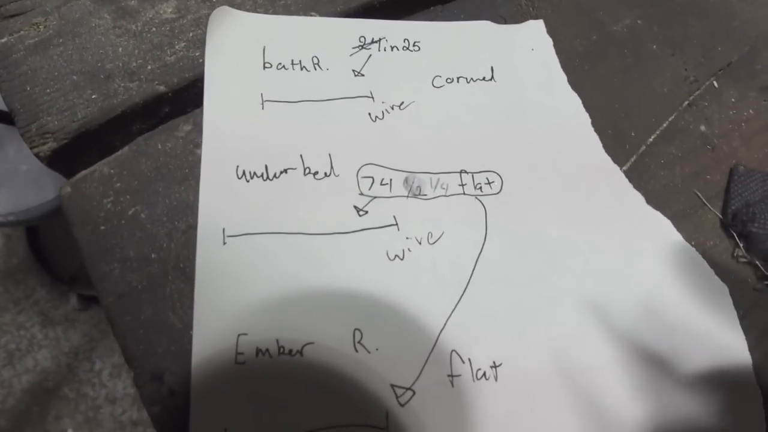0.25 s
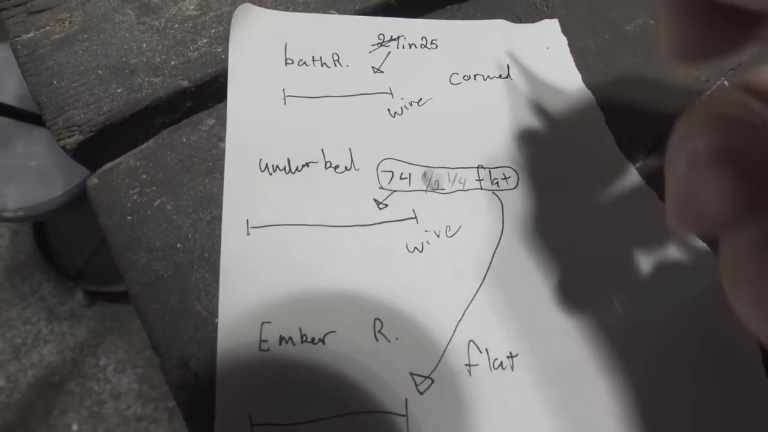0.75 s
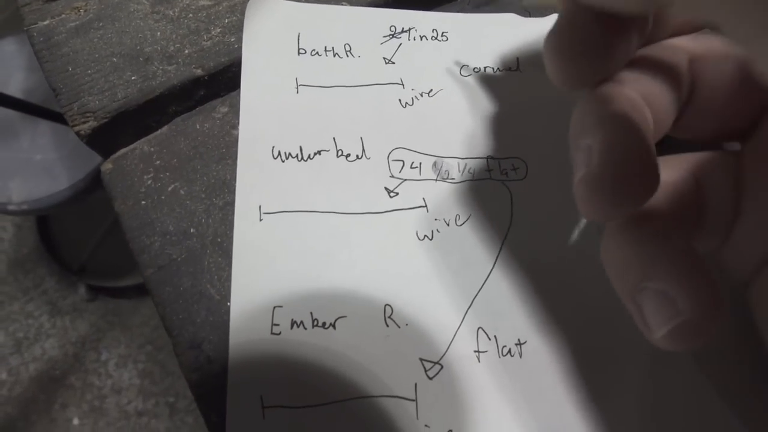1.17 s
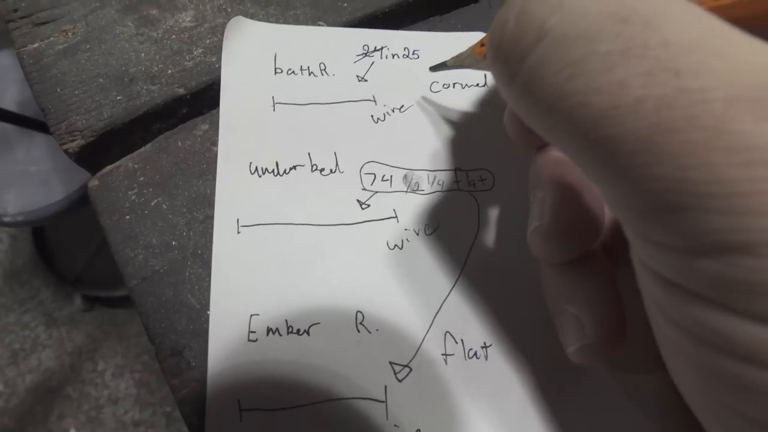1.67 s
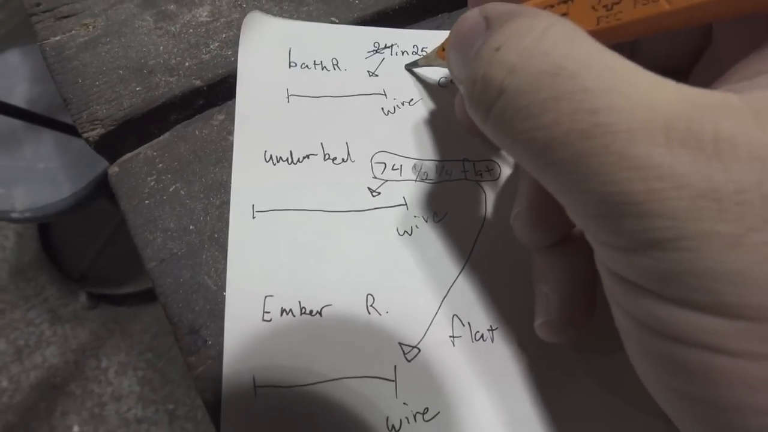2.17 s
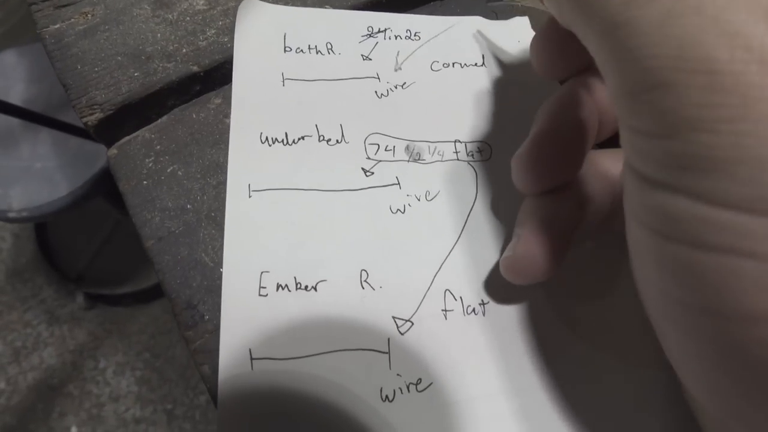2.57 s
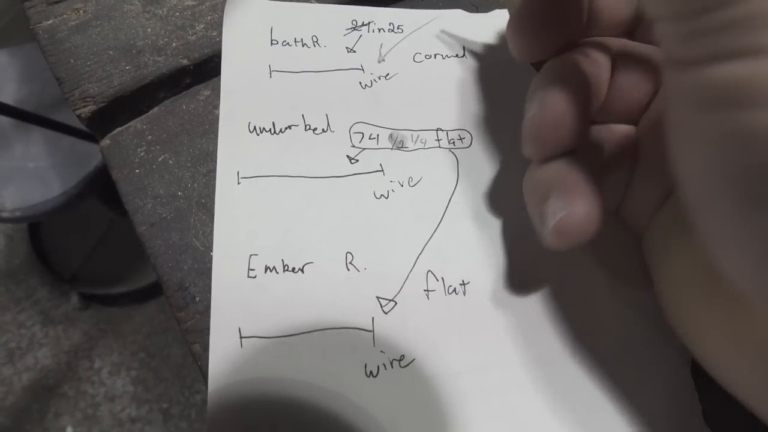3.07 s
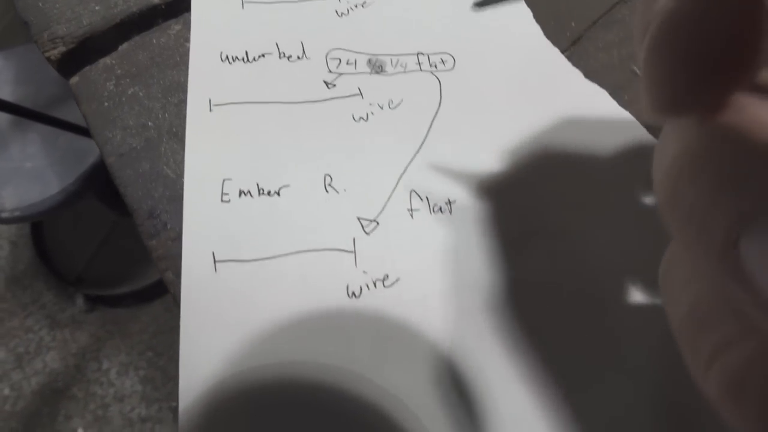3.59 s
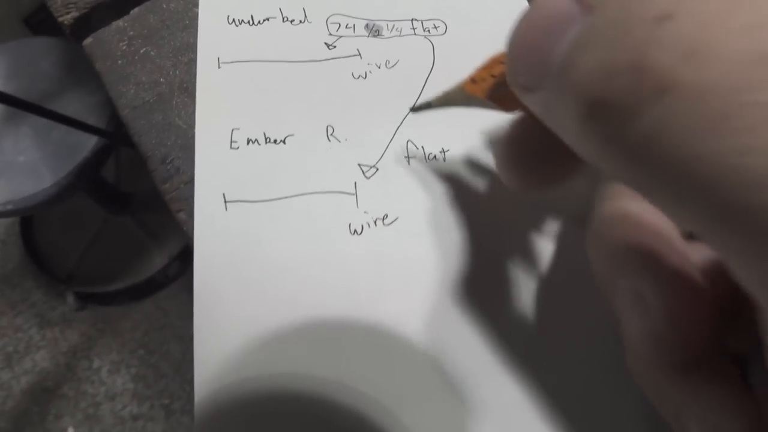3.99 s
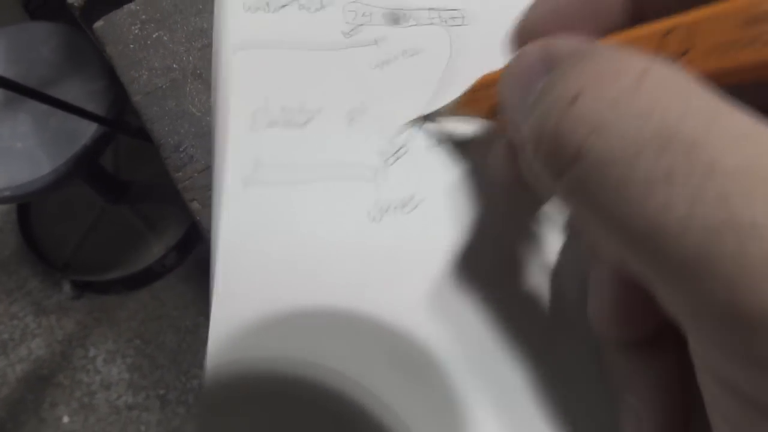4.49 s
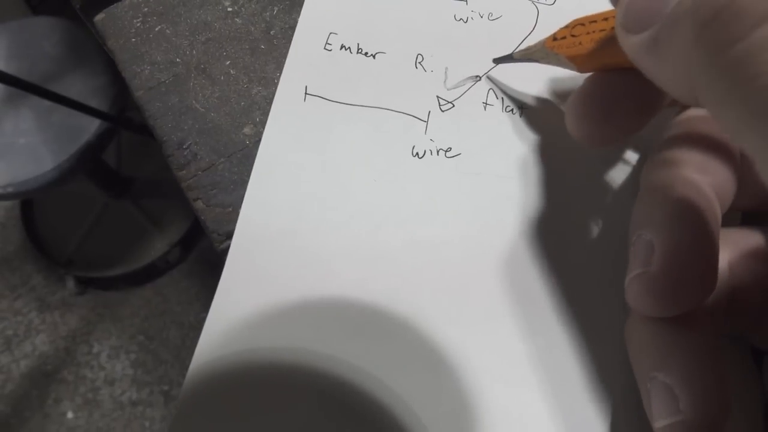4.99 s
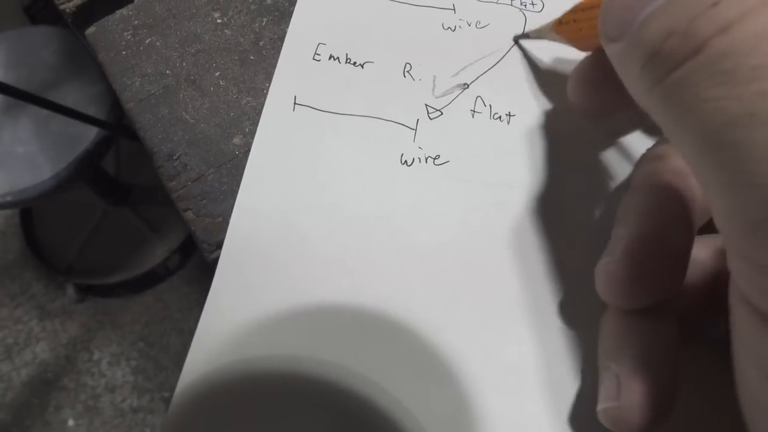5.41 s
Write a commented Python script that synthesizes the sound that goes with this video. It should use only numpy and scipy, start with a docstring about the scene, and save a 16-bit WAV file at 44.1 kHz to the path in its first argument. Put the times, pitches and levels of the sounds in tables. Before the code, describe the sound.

A lamp ballast buzzes continuously in a workshop, over soft hiss and low rumble, its bright overtones slowly swelling and fading. Faint grainy rattles come first; a pencil then taps and scratches paper on a hard slab around 2.3 seconds, again more sharply near 4.5, and a last time at the end. Close handheld stereo microphones, short dry room echo.

```python
"""A workshop: a lamp ballast buzzes at twice the mains frequency over patchy hiss and a soft rumble.
The buzz is a stack of overtones; hand-held microphones drift through its standing waves, so they swell and fade.
A pencil taps and scratches ticks on a sheet of paper on a hard slab: single blows and rough noise ring
resonances of tip, sheet, shaft and slab. Something small rattles now and then in bursts of grainy noise."""
import sys
import numpy as np
from scipy import signal
from scipy.fft import rfft, irfft, next_fast_len
from scipy.io import wavfile
from scipy.ndimage import uniform_filter1d, map_coordinates

SR = 44100
rng = np.random.default_rng(int(sys.argv[2]) if len(sys.argv) > 2 else 0)


def wav_record(signal):
    """Record a signal, one row per channel, as 16-bit PCM in the file named by sys.argv[1]."""
    frames = np.transpose(np.atleast_2d(signal))
    bounded = np.clip(frames, -1, 1)
    # unit amplitude maps onto the largest positive 16-bit level
    quanta = np.round(bounded * 32767).astype(np.int16)
    wavfile.write(sys.argv[1], SR, quanta)


N = 249165

# Resonances; body() applies each set twice. Columns: f/Hz, width/Hz, level per pass/dB
# graphite tip on paper fibres
TIP_MODES = [(6500, 950, 0), (9600, 1200, -1.5), (13200, 3000, -5)]
# paper on its hard support
SLAB_MODES = [(250, 120, 1), (680, 300, -1.5), (1150, 450, 0)]


def amp(db):
    """Decibels to gain."""
    return 10 ** (np.asarray(db) / 20)


def unit(x):
    """Scale to rms 1."""
    return x / np.sqrt(np.mean(x ** 2) + 1e-20)


def along(points, hz):
    """Read (Hz, value) points on a log frequency axis."""
    f, v = np.transpose(points)
    return np.interp(np.log(hz + 1), np.log(f + 1), v)


def curves(rows):
    """One value per sample for each column after the time."""
    seconds, *columns = np.transpose(rows)
    return [np.interp(np.arange(N) / SR, seconds, c) for c in columns]


def wobble(rate):
    """A random curve of straight segments, rate knots a second."""
    knots = rng.standard_normal(int(N * rate / SR) + 4)
    return map_coordinates(knots, [np.arange(N) * rate / SR], order=1)


def filtered(x, response):
    """x times a complex response of frequency."""
    m = next_fast_len(N + SR // 2)
    spectrum = rfft(x, m) * response(np.fft.rfftfreq(m, 1 / SR))
    return irfft(spectrum, m)[..., :N]


def body(x, modes):
    """x through a set of resonances, twice over: the valleys between them are deep."""
    def response(f):
        total = 0
        for k, (centre, width, db) in enumerate(modes):
            resonance = 1j * f * width / (centre ** 2 - f ** 2 + 1j * f * width)
            total = total + (-1) ** k * amp(db) * resonance
        return total ** 2
    return filtered(x, response)


def grit(spike_db):
    """Noise whose samples differ widely in size when spike_db is high, like fibres catching."""
    return unit(rng.standard_normal(N) * amp(spike_db * wobble(900)))


def ballast():
    """Each overtone meets the standing waves in its own way, with a small phase difference left to right."""
    # base pitch of the buzz. Columns: t/s, f/Hz
    pitch = [(0, 120.003), (2, 119.992), (3.7, 119.974), (5.65, 119.978)]
    # strong overtones. Columns: multiple, level/dB, then dB per unit of sway, of lean, of tilt
    strong_rows = [(4, -60.0, -0.2, 0.4, 0.4), (5, -56.8, -0.5, 0.0, -0.0), (8, -56.1, 0.7, -0.4, 0.4),
                   (15, -54.1, -0.8, -0.1, -1.3), (16, -57.9, 5.4, -0.5, 1.3), (17, -48.6, 4.4, 0.2, -0.1),
                   (19, -55.8, -1.3, 2.4, 3.0), (20, -45.7, -1.1, -1.6, -1.0), (22, -51.0, 3.2, 1.4, -0.4),
                   (23, -55.1, -0.9, 0.0, -0.7), (24, -53.4, -3.2, 2.4, -1.7), (25, -57.1, 4.8, -2.1, -1.6),
                   (29, -55.5, -1.0, -1.4, 5.0), (30, -52.2, -1.1, 3.1, 0.6), (33, -54.2, -0.1, 0.1, -0.3),
                   (34, -60.2, -3.5, -0.2, -1.8), (36, -57.5, -0.7, 4.6, 1.4), (42, -60.8, 0.2, 1.6, 3.9),
                   (43, -57.7, -2.0, -4.2, 0.5), (44, -61.0, -0.5, -3.1, 3.3), (47, -65.5, 0.4, 2.3, -1.1),
                   (53, -68.1, -1.4, -5.1, 2.5), (58, -64.7, 0.8, 5.8, -1.0), (59, -67.3, -3.5, -4.4, -0.1),
                   (74, -69.2, 6.2, -1.1, 0.9), (86, -66.5, -0.0, 1.6, 0.3), (87, -68.1, -1.6, -2.4, -0.1),
                   (89, -68.1, -0.9, -1.3, -0.4)]
    # drift of the microphones in the standing waves. Columns: t/s, sway, lean, tilt [arbitrary units]
    drift_path = [(0.1, 0.5, -1.8, 0.4), (1.3, 0.6, -1.0, -0.2), (1.45, 0.6, -0.3, 0.8),
                  (1.75, 1.0, 0.2, 1.1), (2.0, 0.8, 0.6, 1.2), (2.6, 0.7, 1.5, 0.4), (3.1, 0.4, 1.9, 0.3),
                  (3.3, 0.3, 1.2, -1.5), (3.6, 0.4, 0.0, -2.6), (4.0, -0.7, -0.2, -0.6),
                  (4.3, -1.7, 0.1, 0.2), (4.8, -2.0, 0.1, 0.5)]
    # ceiling of the weaker overtones, before drift and waver. Columns: f/Hz, level/dB
    weak_ceiling = [(480, -58), (780, -68.5), (1500, -60), (3600, -59), (4700, -66), (6400, -68),
                    (8200, -73.5), (9100, -71.5), (11000, -77), (14000, -84)]
    # middle level of the faint lines between the overtones. Columns: f/Hz, level/dB
    halfway = [(2400, -67.5), (4700, -70), (8200, -81.5), (11000, -80), (14000, -90)]
    weak_spread_db, weak_drift_db = 4, 1.76  # scatter below the ceiling; swing per unit of drift
    turn = 2 * np.pi * np.cumsum(curves(pitch)[0]) / SR
    t, step = np.arange(N), 64  # levels are worked out every 64 samples
    drift = np.array(curves(drift_path))[:, ::step]
    seconds = t[::step] / SR
    out, halves = np.zeros((2, N)), np.zeros(N, complex)
    strong = {row[0]: row[1:] for row in strong_rows}
    for k in range(4, 122):
        tone = np.exp(1j * k * turn)
        hz = k * pitch[0][1]
        start, start_half = rng.uniform(0, 2 * np.pi, size=2)
        apart, scatter, scatter_half, *swing = rng.normal(size=6)
        weak_db = along(weak_ceiling, hz) - weak_spread_db * abs(scatter)
        weak_slopes = weak_drift_db * np.array(swing)
        db, *slopes = strong.get(k, (weak_db, *weak_slopes))
        waver_db = 0.88 * np.interp(seconds, np.arange(13) / 2, rng.normal(size=13))
        level = amp(db + slopes @ drift + waver_db)
        wave = np.interp(t, t[::step], level) * np.sqrt(2) * tone  # levels are rms
        lead = .2 * apart  # radians
        left = (wave * np.exp(1j * (start + lead))).imag
        right = (wave * np.exp(1j * (start - lead))).imag
        out += [left, right]
        if 20 <= k < 110:  # the two half-cycles of the mains are not quite alike: faint lines halfway
            half_db = along(halfway, hz) + 6.6 * scatter_half
            halves += amp(half_db) * np.exp(1j * start_half) * tone
    return out + (halves * np.exp(.5j * turn)).imag  # half a multiple higher


def room():
    """Patchy hiss of the workshop, its low end swelling slowly as a rumble."""
    # colour of the hiss. Columns: f/Hz, relative level per Hz/dB
    air_colour = [(30, -37), (62, -17), (125, -1), (220, 0), (400, -7.5), (780, -12.5), (980, -11),
                  (1500, -13.5), (2300, -12), (3100, -17.5), (4700, -21.5), (6500, -24.5), (8300, -30.5),
                  (10500, -29), (14500, -41), (16000, -55)]
    # likeness of left and right. Columns: f/Hz, correlation
    likeness = [(60, 1), (500, 0.75), (12000, 0.49)]
    # swell of the low rumble. Columns: t/s, level change/dB
    rumble_swell = [(0, 2.5), (1, -3), (4.7, 0), (5.65, -1.5)]
    z = signal.stft(rng.standard_normal((2, N)), nperseg=512)[2]
    # random patches, smoothed over frequency and then time
    field = uniform_filter1d(rng.standard_normal(z.shape[1:]), 6, 0)
    field = uniform_filter1d(field, 14, 1)
    pair = signal.istft(z * amp(0.68 * unit(field)), nperseg=512)[1][:, :N]

    def mid_side(hz):
        angle = np.arccos(np.clip(along(likeness, hz), -1, 1)) / 2
        return amp(along(air_colour, hz)) * [np.cos(angle), np.sin(angle)]

    mid, side = filtered(pair, mid_side)
    air = amp(-45.5) * unit(np.array([mid + side, mid - side]))
    low = filtered(air, lambda hz: 1 / (1 + (hz / 350) ** 4))
    return air + (amp(curves(rumble_swell)[0]) - 1) * low


def rattles():
    """Short bursts of grainy contact that die away."""
    # bursts, level before the onset and fade. Columns: t/s, length/s, level/dB
    bursts = [(0.0, 0.056, -49), (.47, 0.087, -45), (0.714, .12, -46), (1.192, 0.11, -43),
              (3.169, 0.16, -39.5), (3.857, 0.12, -44.5), (5.507, .07, -38.5)]
    # resonances of the small loose thing. Columns: f/Hz, width/Hz, level per pass/dB
    loose_modes = [(1800, 500, -1), (2500, 1000, 0), (5500, 4000, -13)]
    t, shape = np.arange(N) / SR, np.zeros(N)
    for s, length, db in bursts:
        onset = np.clip((t - s) / .01, 0, 1)
        fade = np.clip((s + length - t) / length, 0, 1)
        shape += amp(db) * onset * fade
    return shape * amp(4.0 * wobble(90)) * unit(body(grit(spike_db=0.0), loose_modes))


def taps(events, modes, gain_db):
    """Single blows ringing a set of resonances."""
    blows = np.zeros(N)
    for s, db in events:
        blows[round(s * SR)] = amp(db + gain_db)
    return body(blows, modes)


def knocks():
    """The pencil lands: each blow rings the paper on its slab."""
    # landings. Columns: t/s, level before the blow gain/dB
    landings = [(0.082, -29), (2.255, -26.5), (2.411, -23), (2.444, -12.5), (4.512, -32), (5.373, -20.5),
                (5.428, -26), (5.577, -25)]
    return taps(landings, SLAB_MODES, gain_db=29.0)


def ticks():
    """The tip touches the paper: each blow rings its two lower resonances."""
    # touches. Columns: t/s, level before the blow gain/dB
    touches = [(2.2418, -29), (2.2534, -37), (2.3984, -13), (4.4144, -32), (4.4224, -38), (4.5665, -12),
               (5.3672, -22), (5.5682, -24)]
    return taps(touches, TIP_MODES[:2], gain_db=13.5)


def strokes():
    """The tip drags over fibres: it bites, presses harder, eases and lifts; sheet, wood and slab ring on a little."""
    # pencil strokes. Columns: down t/s, hardest t/s, up t/s, hiss level at hardest/dB,
    # softer at down/dB, softer at up/dB, then sheet, shaft and slab level over the hiss/dB
    stroke_rows = [(2.276, 2.341, 2.364, -34, 9, 8, -11, -30, -27),
                   (2.391, 2.399, 2.402, -32, 9, 8, -7, -30, -20),
                   (2.409, 2.448, 2.467, -20.5, 6, 8, -11, -16, -12),
                   (4.095, 4.097, 4.104, -47, 0, 6, -1, -20, -20),
                   (4.46, 4.506, 4.515, -37, 5, 3, -5, -7, -20),
                   (4.535, 4.568, 4.575, -17, 25, 7, -6, -9, -19),
                   (4.575, 4.589, 4.612, -19, 2, 4, 1.5, -1.5, -19),
                   (4.63, 4.645, 4.69, -48, 2, 6, 0, -2, -5),
                   (5.392, 5.432, 5.474, -27, 10, 4, -8, -22, -17),
                   (5.566, 5.645, 5.7, -31.5, 4, 0, -4, -10, -16)]
    # flexing paper. Columns: f/Hz, width/Hz, level per pass/dB
    sheet_modes = [(4300, 1500, 0)]
    # loaded wooden pencil. Columns: f/Hz, width/Hz, level per pass/dB
    shaft_modes = [(1380, 850, -2), (2547, 590, 2), (3270, 710, 0.5), (5800, 660, -2.5)]
    # time to fall 60 dB after the lift: hiss, sheet, shaft, slab [s]
    ring_t60 = [.045, .045, .08, .13]
    bite_s = 0.0052  # the tip sets down
    mode_sets = (TIP_MODES, sheet_modes, shaft_modes, SLAB_MODES)
    parts = np.array([unit(body(grit(spike_db=2.5), modes)) for modes in mode_sets])
    t, levels = np.arange(N) / SR, np.zeros((4, N))
    for down, hardest, up, db, swell_db, sag_db, *over in stroke_rows:
        press_db = db - np.interp(t, [down, hardest, up], [swell_db, 0, sag_db])
        ring_db = -60 * np.maximum(t - up, 0) / np.c_[ring_t60]
        bite = np.clip((t - down) / bite_s, 0, 1)
        levels += bite * amp(press_db + ring_db + np.c_[[0, *over]])
    return amp(1.44 * wobble(150)) * np.sum(levels * parts, axis=0)


def echo(x, t60):
    """The walls answer with a short unrelated tail in each channel."""
    fade = amp(-60 * np.arange(SR // 4) / SR / t60)
    tail = rng.standard_normal((2, SR // 4)) * fade
    return signal.fftconvolve(x[None], tail / np.linalg.norm(tail[0]), axes=1)[:, :N]


def scene():
    """Buzz and room, with the near sounds and their echo; the near sounds are slightly louder on the right."""
    near = rattles() + knocks() + ticks() + strokes()
    close = amp(-17.5) * echo(near, t60=0.0044) + amp(-13.5) * echo(near, t60=0.067)
    return ballast() + room() + near * amp([[-.3], [.3]]) + close


def record(dry):
    """The input stage rounds off the highest peaks; the treble fades above 14.8 kHz and ends at the band limit."""
    top_hz = 15900
    rounded = dry / (1 + np.abs(dry / .7) ** 4) ** (1 / 4)
    return filtered(rounded, lambda hz: (hz < top_hz) * amp(-6 * np.clip((hz - 14800) / 1000, 0, 2)))


dry = scene()
out = record(dry)
wav_record(out)
```